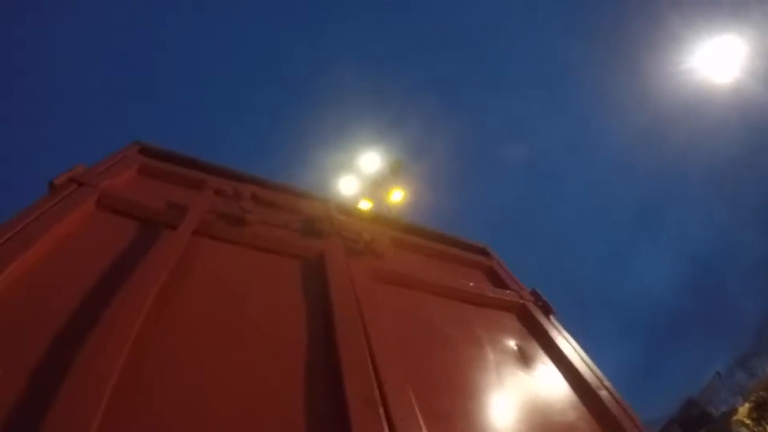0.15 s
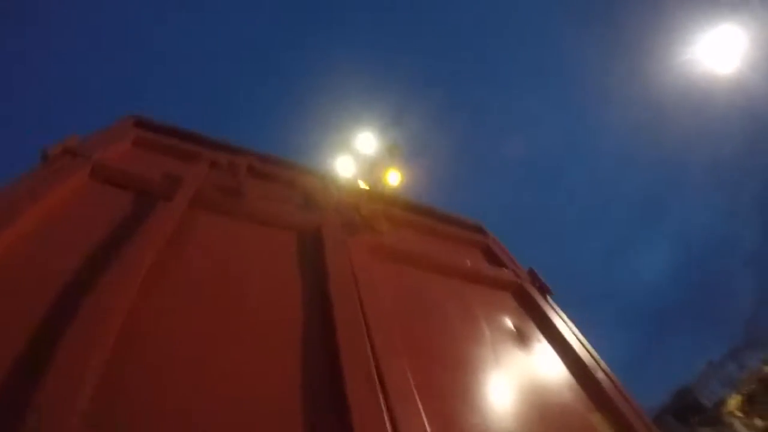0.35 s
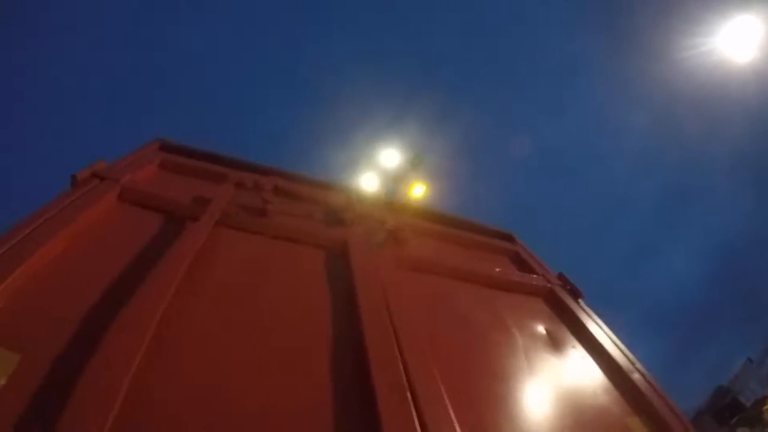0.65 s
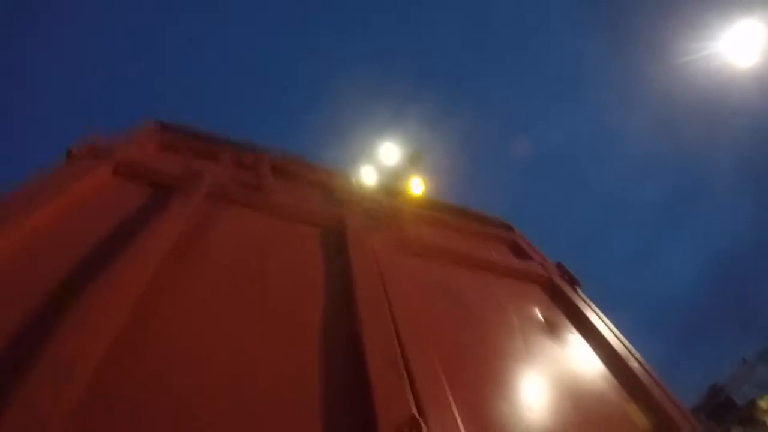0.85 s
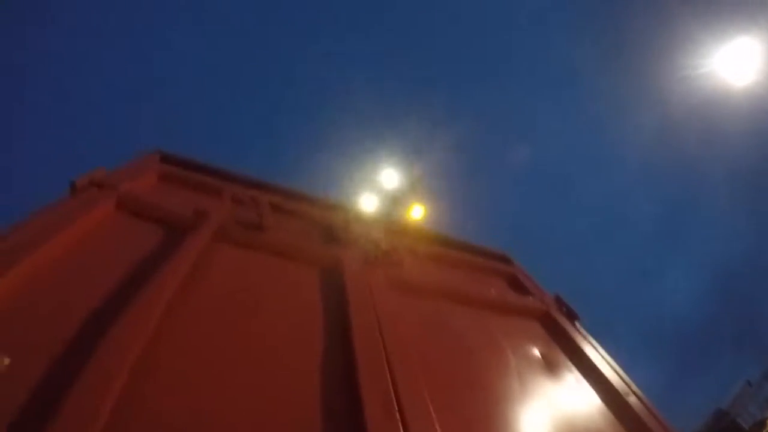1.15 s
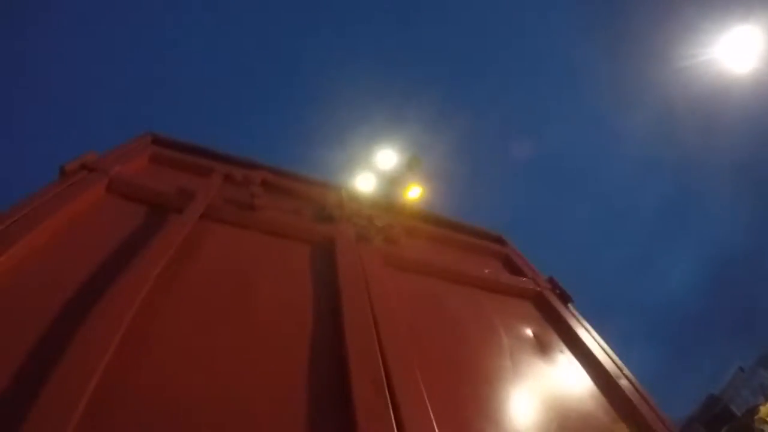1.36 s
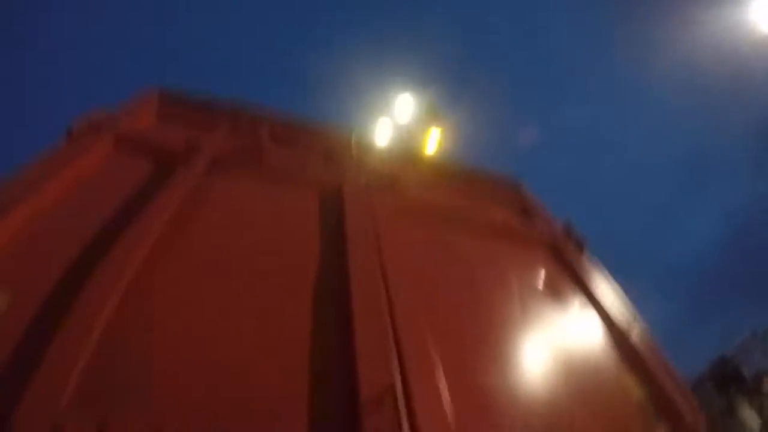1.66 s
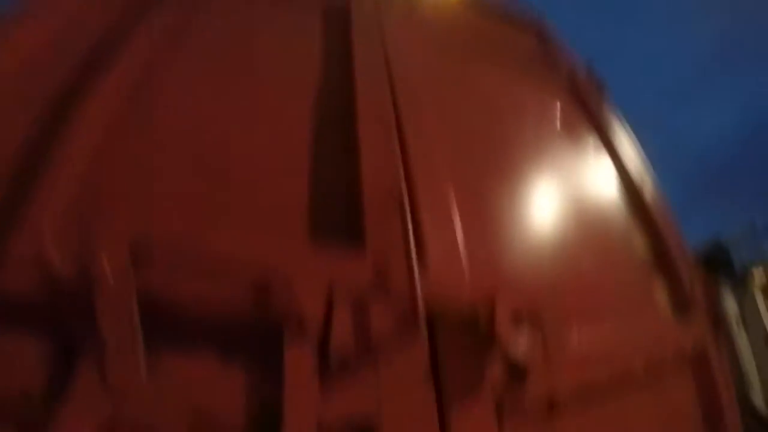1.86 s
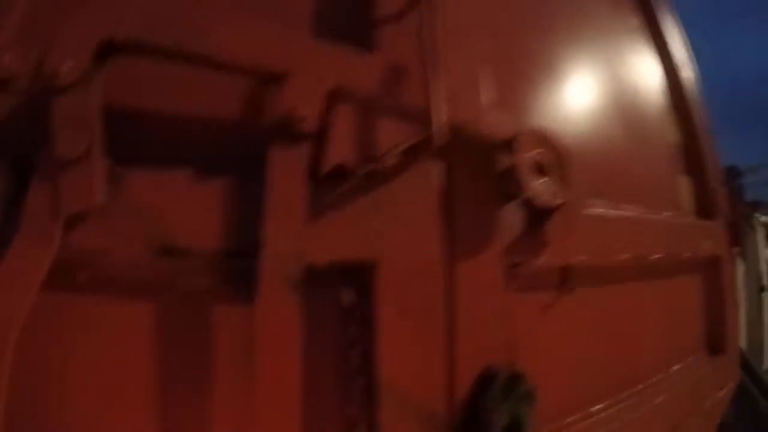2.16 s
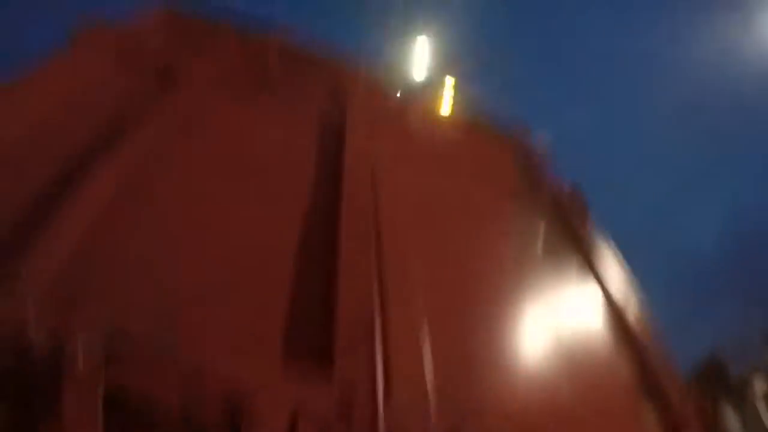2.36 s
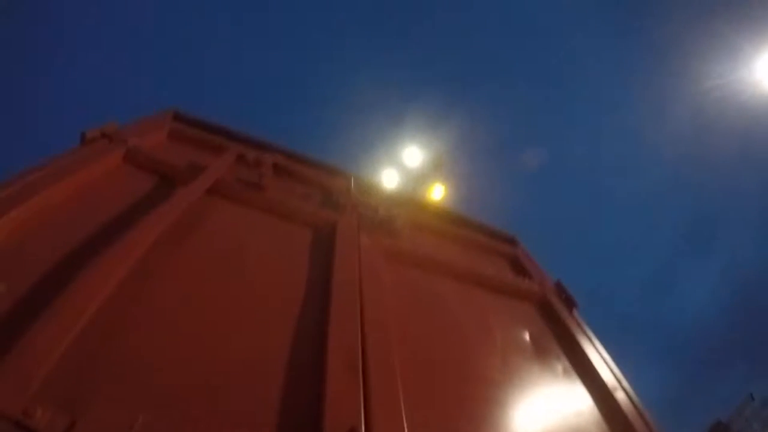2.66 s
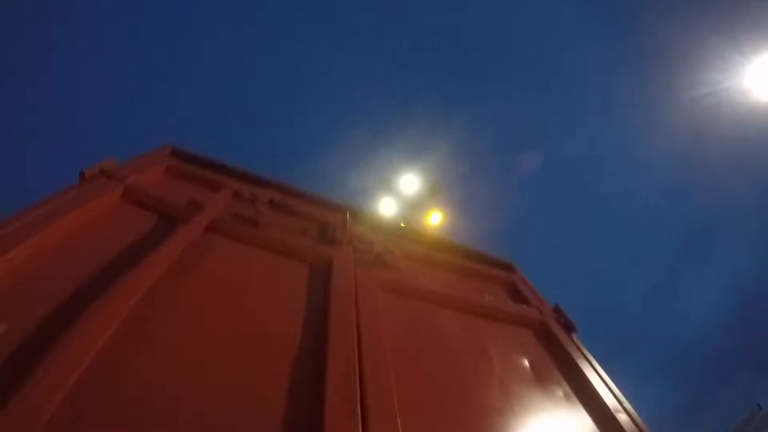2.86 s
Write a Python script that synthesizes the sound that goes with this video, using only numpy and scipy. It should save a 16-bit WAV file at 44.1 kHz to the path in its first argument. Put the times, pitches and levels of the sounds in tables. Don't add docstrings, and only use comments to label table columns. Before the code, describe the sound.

Metal hook gear bangs against a big hollow steel container while a truck engine idles low

```python
import sys
import numpy as np
from scipy import signal
from scipy.fft import rfft, irfft, next_fast_len
from scipy.io import wavfile
from scipy.ndimage import map_coordinates

SR = 44100
rng = np.random.default_rng(int(sys.argv[2]) if len(sys.argv) > 2 else 0)


def invert_db(x):
    u = np.asarray(x, float) / 20
    return 10 ** u


def generate_wav(sig):
    pcm = np.round(np.clip(np.atleast_2d(sig).T, -1, 1) * 32767).astype(np.int16)
    wavfile.write(sys.argv[1], SR, pcm)


N = 132300


def unit(x):
    return x / np.sqrt(np.mean(x ** 2) + 1e-20)


def along(points, hz):
    f, v = np.transpose(points)
    return np.interp(np.log(hz + 1), np.log(f + 1), v)


def curves(rows):
    s, *cols = np.transpose(rows)
    return [np.interp(np.arange(N) / SR, s, c) for c in cols]


def wobble(rate):
    knots = rng.standard_normal(int(N * rate / SR) + 4)
    return map_coordinates(knots, [np.arange(N) * rate / SR])


def filtered(x, response):
    m = next_fast_len(len(x) + SR // 2)
    return irfft(rfft(x, m) * response(np.fft.rfftfreq(m, 1 / SR)), m)[:len(x)]


def resonances(peaks):
    def response(f):
        total = 0
        for k, (centre, width, db) in enumerate(peaks):
            damping = 1j * f * width
            total = total + (-1) ** k * invert_db(db) * damping / (centre * centre - f * f + damping)
        return total
    return response


def dying(size, spectrum, t60s, window):
    hz, t, z = signal.stft(rng.standard_normal(size), SR, nperseg=window)
    z = z * invert_db(spectrum(hz)[:, None] - 60 * t / along(t60s, hz)[:, None])
    x = signal.istft(z, SR, nperseg=window)[1][:size]
    return x / np.sqrt(np.mean(x[:SR // 50] ** 2))


def ringing(modes, t, spread_db):
    total = np.zeros(len(t))
    for hz, db, t60 in modes:
        luck, phase = rng.standard_normal(2)
        swell = np.clip(t * hz / 4, 0, 1)
        total += invert_db(db + spread_db * luck - 60 * t / t60) * np.sin(2 * np.pi * hz * t + phase) * swell
    return total


def add(out, s, x):
    part = out[round(s * SR):][:len(x)]
    part += x[:len(part)]


def engine():
    orders_db = [-35, -42.5, -40.5, -78, -54.5, -58, -85]
    # frequency_hz [Hz], density_db [dB per Hz]
    roar_colour = [(24, -25), (40, 0.5), (115, -7), (450, -23.5), (740, -32), (1050, -21), (1350, -37.5),
                   (2330, -35), (7000, -54.5), (9100, -61), (15400, -120)]
    firing_hz, jitter, cylinder_db = 33.24, 0.02945, 5.5
    turns = np.cumsum(firing_hz * (1 + jitter * wobble(6.7))) / SR
    orders = np.zeros(N)
    for k, db in enumerate(orders_db):
        orders += invert_db(db + cylinder_db * wobble(9)) * np.sin(2 * np.pi * (k + 1) * turns)

    beat = 1 + 0.16 * np.cos(2 * np.pi * turns)
    roar = unit(filtered(rng.standard_normal(N) * beat, lambda f: invert_db(along(roar_colour, f))))
    t = np.arange(N) / SR
    ease_db = -3 * np.clip((t - 2.69) / 0.14, 0, 1)
    roar_db = ease_db - 40.5 + 0.57 * wobble(3.02)

    band = resonances([(1045, 190, 0)])
    block = unit(filtered(rng.standard_normal(N) * beat, lambda f: band(f) ** 2))
    block_db = -66 + 2.9 * wobble(11.2)
    pump = invert_db(-84 + 2.5 * wobble(20)) * np.sin(2 * np.pi * 9600 * t + wobble(30))
    return orders + invert_db(roar_db) * roar + invert_db(block_db) * block + pump


def shudder():
    # time_s [s], level_db [dB]
    shaking = [(0.0, -37.5), (0.15, -26), (0.29, -46), (0.35, -19), (0.61, -34.5), (1.09, -23), (1.53, -42),
               (1.65, -29.5), (2.17, -35), (2.21, -16), (2.56, -53), (2.6, -29.5), (3.0, -53)]
    # frequency_hz [Hz], density_db [dB per Hz]
    frame_colour = [(7.1, -16), (12, 3), (32, -5), (60, -17.5), (78, -21), (130, -120)]
    db, = curves(shaking)
    return invert_db(db) * unit(filtered(rng.standard_normal(N), lambda f: invert_db(along(frame_colour, f))))


def struck_steel(t, tilt_db):
    # frequency_hz [Hz], level_db [dB]
    gear_modes = [(1045, -1), (1170, -3), (1695, -1), (2035, -2), (2270, -3), (2750, -6), (2900, -5),
                  (3110, -4), (4050, -9), (4310, -11), (4600, -12)]
    # frequency_hz [Hz], density_db [dB per Hz]
    plate_colour = [(450, -63), (800, -18), (1140, -1.5), (1450, -13.5), (2270, -1.5), (3620, -8.5),
                    (4400, -7), (7390, -21), (15400, -59.5)]
    # frequency_hz [Hz], t60_s [s]
    plate_decay = [(800, 0.41), (2500, 0.14), (6000, 0.051), (14000, 0.051)]
    gear_db, gear_t60, tail_db, tail_t60, contact_s = -1.5, 0.061, -16.5, 0.74, 0.00058

    def slope(hz):
        return tilt_db * np.log2(np.clip(hz, 1150, None) / 2500)

    lumps = np.c_[np.geomspace(600, 16000, num=24), 3 * rng.standard_normal(24)]
    plate = dying(len(t), lambda hz: along(plate_colour, hz) + slope(hz) + along(lumps, hz),
                  plate_decay, window=128)
    tail_decay = [(1000, tail_t60), (8000, 0.38 * tail_t60)]
    plate += invert_db(tail_db) * dying(len(t), lambda hz: along(plate_colour, hz), tail_decay, window=380)

    brightest = max(slope(1800), slope(3300))
    modes = [(hz, db + slope(hz) - brightest, gear_t60 * (2500 / hz) ** 0.13) for hz, db in gear_modes]
    gear = ringing(modes, t, spread_db=4.5)
    attack = np.sin(np.pi / 2 * np.clip(t / contact_s, 0, 1)) ** 2
    return (plate + invert_db(gear_db) * gear) * attack * np.cos(np.pi / 2 * t / t[-1])


def chatter(chatter_s, lead_s):
    t = np.arange(SR // 10) / SR
    bounces = rng.standard_normal(len(t)) > 2.1
    size = invert_db(6.5 * rng.standard_normal(len(t))) * bounces
    size *= np.clip((chatter_s - t) / 0.0014, 0, 1)
    size *= invert_db(-2 * t / chatter_s)
    size[0], size[round(lead_s * SR)] = 0.3, 5.5
    return size / np.linalg.norm(size)


def wall_boom(t):
    # frequency_hz [Hz], level_db [dB]
    wall_modes = [(65, -3), (104, -3.5), (167, -1.5), (204, -3.5), (250, -9.5), (314, -6), (352, -6),
                  (410, -2), (430, -10.5), (470, -17), (541, -8), (670, -12), (1050, -20), (1170, -18)]
    # frequency_hz [Hz], density_db [dB per Hz]
    wall_colour = [(26, -19), (45, 2.5), (75, 7), (134, -0.5), (284, -6), (414, -4), (709, -15), (900, -34),
                   (1170, -53), (1980, -120)]
    # frequency_hz [Hz], t60_s [s]
    wall_decay = [(60, 1.04), (300, 1.3), (800, 0.64)]
    ring_db, rise_s = -9.5, 0.004
    ring = ringing([(hz, db, along(wall_decay, hz)) for hz, db in wall_modes], t, spread_db=5.0)
    boom = dying(len(t), lambda hz: along(wall_colour, hz), wall_decay, window=1800)
    boom = boom + invert_db(ring_db) * ring
    return boom * (1 - np.exp(-t / rise_s)) * np.cos(np.pi / 2 * t / t[-1])


def clanks():
    # start_s [s], peak_db [dB], chatter_s [s],
    # brightness_db [dB per octave], boom_db [dB]
    blows = [
        (.0735, -27.5, 0.0073, -2.5, -36.5),
        (.3459, -27.5, 0.004, -8, -33),
        (.9135, -29.5, 0.0063, -5, -36.5),
        (.976, -28, 0.0048, -5.5, -28.5),
        (1.038, -17.5, 0.0083, -5.5, -24.5),
        (1.0553, -18.5, 0.021, -3, -25.5),
        (1.1012, -15, .008, -1.5, -26),
        (2.2418, -12.5, 0.0056, -3.5, -28),
        (2.2561, -21.5, 0.0086, 4, -28),
             (0.0024, -42, 0.0057, -4.5, -40.5), (0.3992, -31, 0.009, -3, -39.5),
              (0.4874, -33.5, 0.0087, 3.5, -32.5), (0.5223, -29.5, 0.0091, 1.5, -44.5),
              (0.607, -42, 0.0063, -7, -38.5), (0.7693, -37, 0.022, -3, -46.5),
              (0.8947, -38.5, 0.0075, -3, -42), (1.2496, -33, 0.0061, -9.5, -51),
              (1.3784, -34.5, 0.01, 1.5, -42), (1.5799, -46.5, 0.0068, -11, -40.5),
              (1.6566, -38.5, 0.013, -14, -47), (1.8744, -40.5, 0.011, -11, -42.5),
              (2.0234, -42, 0.0044, -8, -42.5), (2.306, -29, 0.0078, 0, -61),
              (2.5587, -37.5, 0.011, 2.5, -35),
             (.2905, -18, .018, 0.7, -39), (1.1528, -15, 0.0091, 5, -30.5), (1.1616, -18, .006, 4, -44.5),
               (1.168, -15.5, 0.0096, 0.5, -39.5), (1.178, -23.5, .012, 2.5, -42.5),
               (1.202, -32, .008, -3.5, -44), (2.1092, -24.5, 0.03, -9.5, -34.5),
               (2.3182, -19.5, 0.031, -2, -23.5), (2.384, -11.5, .009, 5, -25.5),
               (2.397, -13.5, 0.0097, 6.5, -40.5), (2.4115, -12.5, 0.0056, 2, -40),
               (2.419, -17, 0.011, 3.5, -40.5)]
    out, lead_s = np.zeros(N), 0.001
    short, long = np.arange(SR // 3) / SR, np.arange(SR * 3 // 4) / SR
    for s, db, chatter_s, tilt_db, boom_db in blows:
        body = struck_steel(short, tilt_db)
        clank = signal.fftconvolve(body, chatter(chatter_s, lead_s))
        add(out, max(s - lead_s, 0), invert_db(db - 11.5) * clank)
        add(out, s, invert_db(boom_db) * wall_boom(long))
    return out


def small_steel():
    # start_s [s], level_db [dB]
    latch = [(3160, -2.5, 0.08), (5400, -11, 0.07), (6700, -31, .15), (7230, -19, .15), (8160, -28, 0.087),
             (9300, -28, .08)]
    latch_hits = [
        (0.0727, -31),
        (2.3835, -44.5),
    ]
    rail = [(1055, -3, .11), (1120, -.5, .1), (1190, -4, .08), (1389, -6, .12), (2885, -12, .12)]
    rail_hits = [
        (.293, -37),
        (.428, -36.5),
        (1.582, -47),
        (1.876, -42),
        (2.025, -43),
        (2.112, -30),
        (2.62, -45),
    ]
    pin = [(9598, -3, .42), (10840, -7, .38), (9630, -17, .25)]
    pin_hits = [
        (.4868, -66),
        (1.1014, -51),
        (1.17, -56),
    ]
    link = [(10140, .1, .16), (10110, -10, .2), (1655, 12, .15), (4360, -2, .07)]
    link_hits = [
        (.4868, -46),
        (1.1014, -47),
    ]
    hook = [(2240, 3, 0.16), (2344, 9, 0.055), (418.3, 1.5, 0.34), (1797, -2.5, 0.16), (4280, -9, 0.09)]
    hook_hits = [
        (1.1539, -31),
        (2.385, -22.5),
        (2.41, -26.5),
    ]
    rib = [(371, .1, .22), (355, -7, .2), (1200, -14, .12), (290, -12, .15)]
    rib_hits = [
        (1.873, -29),
        (2.165, -35),
    ]
    out, t = np.zeros(N), np.arange(SR // 2) / SR
    parts = [(latch, latch_hits), (rail, rail_hits), (pin, pin_hits),
             (link, link_hits), (hook, hook_hits), (rib, rib_hits)]
    for modes, hits in parts:
        for s, db in hits:
            add(out, s, invert_db(db) * ringing(modes, t, spread_db=3))
    return out


def ticks():
    # start_s [s], level_db [dB], t60_s [s]
    tick_hits = [
        (0.2864, -42, .03),
        (.424, -49, .02),
        (1.0347, -39, .02),
        (1.099, -43, .015),
        (1.1012, -30, 0.056),
        (1.1545, -28, 0.038),
        (2.3183, -38, 0.032),
        (2.3843, -24.5, .03),
        (2.4195, -31, 0.032),
    ]
    # frequency_hz [Hz], density_db [dB per Hz]
    tick_colour = [(900, -40), (2500, 11.5), (5000, -11.5), (9000, -16), (15000, -26)]
    out, t = np.zeros(N), np.arange(SR // 20) / SR
    for s, db, t60 in tick_hits:
        crack = unit(filtered(rng.standard_normal(len(t)), lambda f: invert_db(along(tick_colour, f))))
        add(out, s, invert_db(db - 60 * t / t60) * crack)
    return out


def notes():
    # start_s [s], pitch_hz [Hz], level_db [dB],
    # t60_s [s]
    single_notes = [(0.292, 2720, -31, .07), (.399, 3110, -38.5, 0.047), (.524, 4600, -42.5, .06),
                    (.77, 2257, -44, .08), (.895, 2700, -42, 0.054), (.914, 1705, -34, 0.09),
                    (.915, 4550, -44, 0.054), (.978, 2040, -43, .1), (1.039, 2040, -23.5, 0.079),
                    (1.041, 4030, -32.5, .07), (1.056, 3080, -32, 0.089), (1.102, 2870, -34, 0.2),
                    (1.157, 2920, -31, 0.14), (1.16, 1696, -27, 0.14), (1.379, 2900, -46, 0.054),
                    (.985, 200, -27.5, .35), (1.103, 1670, -28.5, 0.16), (1.163, 2130, -30, .14),
                    (1.71, 4450, -61, 0.46), (1.805, 3930, -59, 0.27), (2.244, 2900, -30, 0.087),
                    (2.385, 4410, -36, .12), (2.386, 2950, -26, 0.11), (2.412, 4420, -30, .1),
                    (2.43, 2280, -34, 0.2), (2.59, 170, -31, 0.53)]
    out, t = np.zeros(N), np.arange(SR // 3) / SR
    for s, hz, db, t60 in single_notes:
        pair = [(hz, 0, t60), (hz * 1.025, -5, t60)]
        add(out, s, invert_db(db) * ringing(pair, t, spread_db=3.5))
    return out


def roller():
    # time_s [s], pitch_hz [Hz], level_db [dB]
    squeal_glide = [(1.63, 2760, -59), (1.65, 2754, -53), (1.69, 2844, -63), (1.72, 2834, -57),
                    (1.8, 2720, -50), (1.92, 2640, -53.5), (1.96, 2650, -66), (2.02, 2710, -56),
                    (2.099, 2660, -70)]
    # time_s [s], level_db [dB]
    drag = [(1.56, -72), (1.59, -58), (1.64, -57.5), (1.69, -47), (1.8, -53.5), (1.9, -54), (2.0, -57),
            (2.1, -48), (2.2, -50)]
    # frequency_hz [Hz], width_hz [Hz], level_db [dB]
    bracket = [(1130, 130, 2), (1660, 60, -7), (2080, 60, -11), (3930, 70, -17), (4460, 170, -15)]
    # frequency_hz [Hz], width_hz [Hz], level_db [dB]
    axle = [(678, 26, 0)]
    hz, db = curves(squeal_glide)
    drag_db, = curves(drag)
    t = np.arange(N) / SR
    inside_s = np.minimum(t - squeal_glide[0][0], squeal_glide[-1][0] - t)
    gate = np.clip(inside_s / 0.022, 0, 1)

    scatter_hz, swing, flutter_db = 90, 1.1, 3
    hoarse = unit(filtered(rng.standard_normal(N), lambda f: 1 / (1 + (f / scatter_hz) ** 2) ** .8))
    tone = np.sin(2 * np.pi * np.cumsum(hz) / SR + swing * hoarse)
    squeal = unit(tone * invert_db(flutter_db * wobble(60)))

    grit = rng.standard_normal(N) * invert_db(2.8 * wobble(120))
    scrape = unit(filtered(grit, lambda f: resonances(bracket)(f) / (1 + (f / 4700) ** 6)))

    moan = unit(filtered(rng.standard_normal(N), lambda f: resonances(axle)(f) ** 2))
    moan_s, moan_spread_s = 1.72, 0.027
    swell = np.exp(-((t - moan_s) / moan_spread_s) ** 2 / 2)
    return gate * invert_db(db) * squeal + invert_db(drag_db) * scrape + invert_db(-45) * swell * moan


def scene():
    mix = engine() + shudder() + clanks() + small_steel() + ticks() + notes() + roller()
    return mix[None]


def top_cut(x):
    return signal.sosfilt(signal.butter(12, 15600, fs=SR, output="sos"), x)


def record(dry):
    ceiling, hiss_db, top_hz = .62, -69.5, 15150
    x = dry[0] / (1 + (dry[0] / ceiling) ** 4) ** (1 / 4)
    x = x + invert_db(hiss_db) * rng.standard_normal(N)
    mix = filtered(x, lambda f: 1 / np.sqrt(1 + (f / top_hz) ** 150))[None]
    return top_cut(mix)


dry = scene()
out = record(dry)
generate_wav(out)
```